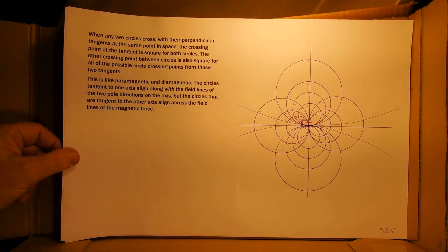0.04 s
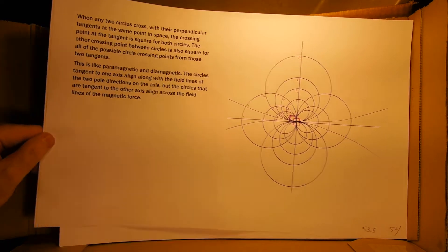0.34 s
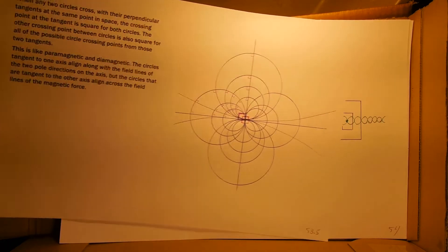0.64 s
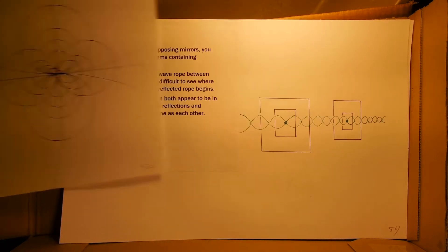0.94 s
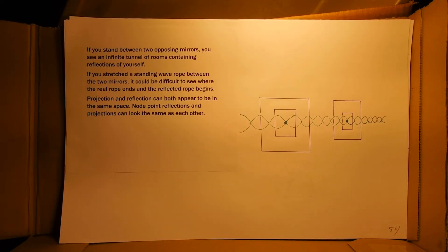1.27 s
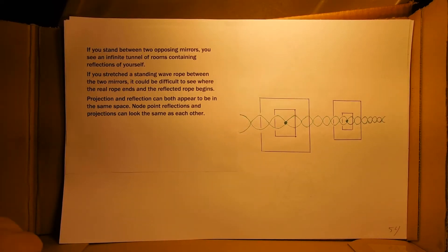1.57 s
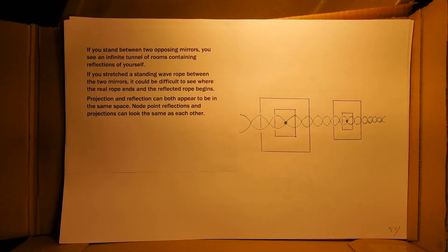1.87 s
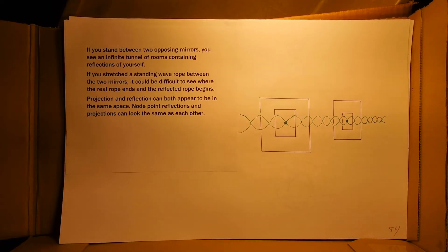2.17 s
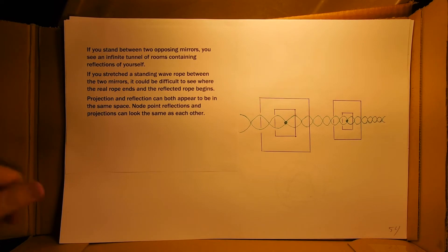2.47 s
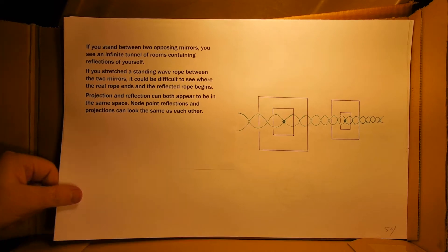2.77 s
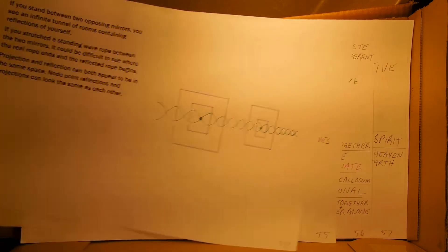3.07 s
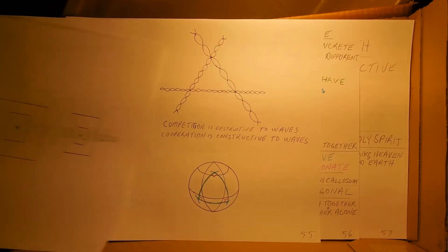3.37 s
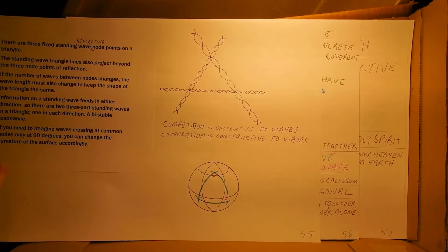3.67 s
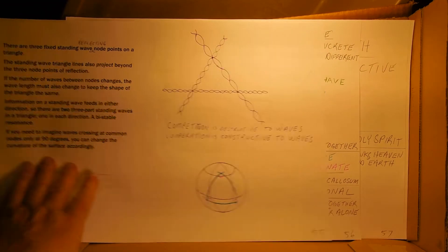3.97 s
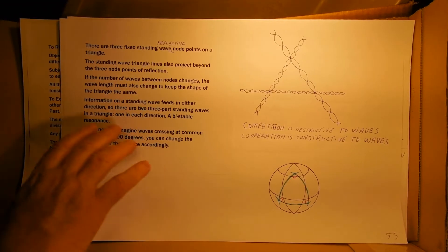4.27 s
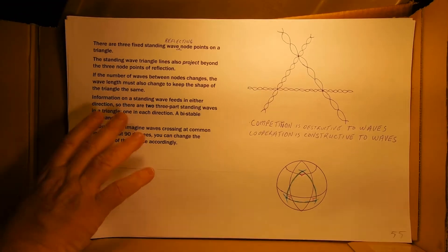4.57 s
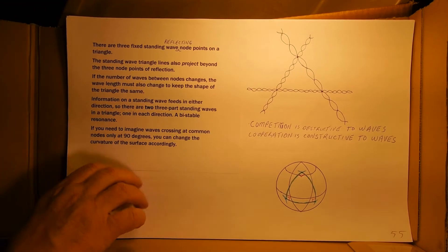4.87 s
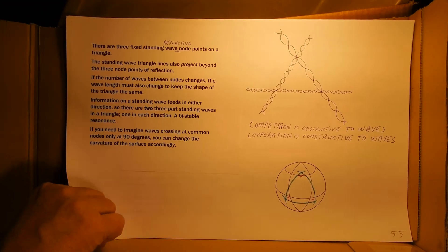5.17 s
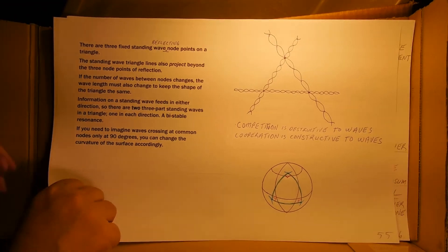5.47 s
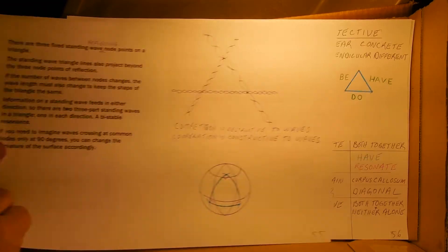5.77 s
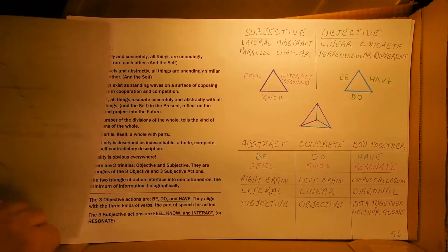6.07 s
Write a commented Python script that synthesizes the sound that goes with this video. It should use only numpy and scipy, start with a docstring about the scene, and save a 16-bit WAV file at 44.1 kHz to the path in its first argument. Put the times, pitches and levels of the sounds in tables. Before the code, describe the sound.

Large paper sheets are drawn one by one across a stack, heard up close over a faint room hush. Each move brings a soft swish of air, a dry hiss, a scraping edge and sharp buckling pops. One sheet slaps down early, a brief pause follows, and the handling grows firmer, peaking in a loud slap and wooden knock before more sliding. The surrounding wooden box adds tight echoes.

```python
"""Three large sheets of paper slide off a stack, one after another, in a wooden box in a quiet room.
Out of the hush the first sheet sweeps air aside, hisses over the next and scrapes with its edge. It buckles
with pops and, just after one second, slaps down. A lull follows, then firmer strokes and snaps around three
seconds, and a faint whistle. Past four seconds come the hardest slap and a knock on the wood; sliding and
popping run on to the end. The close wooden walls colour everything with short echoes."""
import sys
import numpy as np
from scipy import signal
from scipy.fft import rfft, irfft
from scipy.io import wavfile
from scipy.ndimage import uniform_filter1d, minimum_filter1d

SR = 44100
rng = np.random.default_rng(int(sys.argv[2]) if len(sys.argv) > 2 else 0)


def to_wav(sig):
    """Store sig (one row per channel, or 1-D mono) as 16-bit WAV at the path in sys.argv[1].

    Samples outside -1..1 are clipped; the rate is SR.
    """
    pcm = np.clip(np.atleast_2d(sig), -1, 1) * 32767
    pcm = np.round(pcm).astype(np.int16)
    wavfile.write(sys.argv[1], SR, pcm.T)  # frames by channels


N = 278712

# Tone curves for room hush, swept air, edge, face and landing. Each row: frequency in Hz, level in dB.
HUSH_EQ = [(20, -13), (74, -20), (204, -16), (399, -8.5), (1300, -6.5), (2400, -11), (16000, -29)]
SWEEP_EQ = [(60, -29), (150, -18), (300, -8), (450, -1.5), (800, 2.5), (1300, 6), (2000, 2.5), (4000, -51),
            (16000, -90)]
SCRAPE_EQ = [(100, -36), (400, -28.5), (900, -13.5), (1500, -4), (2100, 1.5), (3200, 0.5), (5000, -8.5),
             (9000, -12.5), (16000, -57)]
HISS_EQ = [(100, -47.5), (1000, -14.5), (3000, -5.5), (4500, -1.5), (6000, -1.5), (8000, 5), (9200, -2.5),
           (10500, -12), (13000, -23), (16000, -34)]
SLAP_EQ = [(30, -39), (200, -26), (400, -14.5), (900, -6.5), (1900, 3), (3200, -1), (5500, -5.5),
           (8200, -6.5), (11000, -22), (16000, -27)]
# The stereo image opens toward the treble. Each row: frequency in Hz, side level against mid in dB.
STEREO_WIDTH = [(60, -16), (300, -14.5), (1300, -10), (2400, -8), (4400, -3.5), (8000, -0.5), (16000, 0.5)]
# Standing waves between the walls. Each row: pitch in Hz, bandwidth in Hz, level in dB.
AIR_MODES = [(210, 12, 2), (391.4, 10, 2), (504, 45, -9), (764, 13.4, 2.5), (936, 37, -4.5)]
# Echoes off the wooden walls. Each row: delay in seconds, gain.
WALL_ECHOES = [(.0028, 0.25), (.0056, 0.31), (.0099, .5), (0.0127, 0.36)]
# A loose sheet bends and sweeps air aside. Each row: start, rise, hold and fade in seconds, level in dB.
AIR_SWEEPS = [(0.116, 0.012, 0.02, 2, -49.5), (1.009, 0.018, 0.021, 0.05, -35.5),
              (1.097, 0.076, 0.026, 0.22, -32), (1.334, 0.03, 0.19, 0.5, -43),
              (1.762, 0.039, 0.024, 0.13, -36), (3.15, 0.2, 0.016, 1.1, -37),
              (3.455, 0.053, 0.14, 0, -38.5), (4.048, 0.039, 0.036, 0.33, -38),
              (4.234, 0.027, 0.031, 0.15, -33), (4.646, 0.015, 0.028, 0.65, -44),
              (5.45, 0.13, 0.11, 0.25, -43), (5.836, 0.044, 0.037, 0.07, -29.5),
              (6.009, 0.011, 0.014, 0.27, -37.5), (6.135, 0.03, 0.16, 0.15, -35.5)]
# A hand pushes one sheet over another.
# Each row: start, rise, hold and fade in seconds, face hiss in dB, edge scrape in dB.
HAND_STROKES = [(.124, .025, .038, .06, -31.5, -38), (.2, .075, .012, .07, -39.5, -34),
                (.31, .05, .08, .2, -49, -43), (.36, .08, .19, .13, -36.5, -42),
                (.67, .1, .08, .35, -42.5, -45), (1.005, .025, .03, .05, -42, -50),
                (1.08, .06, .05, .17, -37, -31), (1.42, .09, .05, .2, -52, -38.5),
                (1.744, .045, .06, .14, -51, -42), (1.9, .1, .45, .5, -62, -63),
                (2.675, .02, .12, .15, -55, -55), (2.82, .1, .03, .1, -42, -44),
                (2.905, .085, .02, .22, -29.5, -42), (3.03, .11, .16, .34, -27, -31),
                (3.43, .025, .17, .08, -35, -36.5), (3.63, .06, .05, .27, -49, -44),
                (4.054, .062, .02, .14, -23, -29.5), (4.17, .04, .02, .12, -29, -33),
                (4.4, .04, .04, .05, -55, -58), (4.483, .015, .03, .2, -29.5, -29.5),
                (4.54, .02, .008, .1, -38, -22.5), (4.6, .06, .025, .1, -34, -35),
                (4.793, .004, .008, .035, -33, -38), (4.83, .028, .015, .05, -37, -32),
                (5.255, .017, .04, .15, -36.5, -41.5), (5.29, .11, .015, .12, -35, -24),
                (5.36, .06, .03, .17, -30, -40), (5.555, .018, .05, .25, -37, -37),
                (5.71, .095, .13, .3, -29, -31), (5.97, .05, .03, .1, -38, -34),
                (6.14, .04, .1, .3, -42, -41)]
# The free span of a rubbed sheet sings, lower as it lengthens.
# Each row: start and end in seconds, first and last pitch in Hz, level in dB.
SINGING_GLIDES = [(0.132, .22, 4900, 3980, -35), (.2, .31, 3600, 2600, -35),
                  (0.251, 0.332, 2250, 1855, -36.5), (0.517, .8, 4750, 4350, -43.5),
                  (1.356, 1.422, 1410, 1390, -42), (3.082, 3.161, 3200, 2490, -39),
                  (5.303, 5.468, 4410, 3345, -32.5)]
# A sheet buckles, small creases high and wide bulges low.
# Each row: start in seconds, level in dB, pitch in Hz, ring length in cycles.
BUCKLE_POPS = [(.464, -14.5, 2020, 8), (.510, -26, 900, 5), (.596, -26, 1390, 4.2), (.633, -40, 372, 6.7),
               (1.009, -26, 3800, 4.6), (1.028, -16, 3450, 9.3), (1.040, -24, 3900, 6),
               (1.055, -30, 3700, 5.3), (1.206, -9.5, 2020, 10), (1.441, -29, 1520, 13),
               (2.089, -33.5, 2530, 11), (2.216, -33, 1160, 13), (2.539, -28, 7950, 4.8),
               (2.712, -45, 307, 4.9), (2.826, -31.5, 1610, 23), (2.840, -23.5, 3800, 1.6),
               (3.057, -24.5, 500, 4.5), (3.074, -13, 7240, 4), (3.154, -8, 2500, 2.3),
               (3.235, -31.5, 448, 6), (3.458, -10, 2200, 2.5), (3.480, -12.5, 1410, 5.6),
               (4.081, -19.5, 2040, 29), (4.293, -4.5, 1780, 6.2), (4.682, -7, 2830, 9.6),
               (4.788, -26.5, 1780, 22), (4.796, -25, 6860, 13), (4.867, -28.5, 830, 5.1),
               (5.165, -23, 2450, 3.5), (5.181, -25.5, 5040, 1.9), (5.286, -27, 780, 8),
               (5.568, -13, 2630, 1.7), (5.606, -18, 3000, 2.2), (5.630, -10.5, 1940, 5.7),
               (5.847, -26, 895, 8.7), (5.888, -20, 2960, 5.4), (5.905, -13, 2460, 3.7),
               (6.154, -19.5, 1700, 3.5)]
# Round, low thumps: after big paper snaps, and at the knock on the wood.
# Each row: start in seconds, level in dB, pitch in Hz, ring length in cycles.
LOW_THUMPS = [(.465, -20.5, 1030, 8.7), (.642, -48, 213, 8.5), (3.064, -42.5, 205, 12),
              (3.157, -21.5, 1030, 9.1), (3.242, -45, 212, 7.9), (3.464, -21.5, 983, 13),
              (4.229, -7.5, 493, 7.8), (4.302, -15.5, 775, 16), (5.636, -18, 801, 20.4)]
# A sheet lands, touching down bit by bit.
# Each row: start in seconds, level in dB, swell and fade in seconds, centre of the crack in Hz.
LANDINGS = [(1.075, -8.5, 0.01, 0.0094, 3100), (1.108, -9.5, 0.0039, 0.015, 3070),
            (1.143, -13, 0.015, 0.016, 2270), (4.225, -1.5, 0.002, 0.008, 7500),
            (4.678, -8.5, 0.0013, 0.0047, 5940), (5.112, -38, 0.015, 0.0069, 2800)]
# Faint, narrow, steady whistling tones. Each row: start and end in seconds, pitch in Hz, level in dB.
WHISTLE_TONES = [(3.6, 3.93, 1290, -46), (3.55, 3.95, 465, -57), (4.92, 5.14, 1345, -54),
                 (4.93, 5.1, 1110, -57)]
# The edge of the stack knocks against the wood. Each row: start in seconds, level in dB.
STACK_KNOCKS = [(4.230, -6), (4.682, -30)]
# The ring of the knocked wood. Each row: pitch in Hz, level in dB, ring length in cycles.
WOOD_MODES = [(386, -10.5, 28), (530.6, -9, 66), (990, 3.5, 19)]

# Layer faders, on top of the levels in the rows.
SWEEP_DB, SCRAPE_DB, HISS_DB = -2.5, -1, 1.9
BUCKLE_DB, THUMP_DB, SLAP_DB, KNOCK_DB = 3, 3, 2, 3
FLAT_EQ = [(20, 0)]


def from_db(db):
    """Decibels to gain."""
    return 10 ** (np.asarray(db) / 20)


def rms_one(x):
    """Scale to rms 1."""
    return x / np.sqrt(np.mean(x ** 2) + 1e-20)


def gain_at(curve, hz):
    """Gain of a tone curve, its points joined on a log-frequency axis."""
    known_hz, level_db = np.transpose(curve)
    return from_db(np.interp(np.log(hz + 1), np.log(known_hz), level_db))


def low_pass(x, hz, order=2):
    """Butterworth low-pass."""
    return signal.sosfilt(signal.butter(order, min(hz, .45 * SR), fs=SR, output="sos"), x + 1e-18)


def resonance(x, hz, width_hz):
    """Two-pole resonance with gain 1 at its peak."""
    r = np.exp(-np.pi * width_hz / SR)
    feedback = [1, -2 * r * np.cos(2 * np.pi * hz / SR), r * r]
    return signal.lfilter(np.array([1, 0, -1]) * (1 - r * r) / 2, feedback, x + 1e-18)


def drift(rate):
    """A random modulator of rms 1 that glides to a new value rate times a second."""
    knots = rng.standard_normal(N // 4)
    return rms_one(np.interp(np.arange(N) * rate / SR, np.arange(len(knots)), knots))


def noise(eq, grain=1, size=N):
    """Stereo noise of rms 1, roughened by a grain envelope and widest in the treble."""
    hz = np.arange(size // 2 + 1) * SR / size
    mid, side = rfft(rng.standard_normal((2, size)) * grain) * gain_at(eq, hz)
    side = side * gain_at(STEREO_WIDTH, hz)
    return rms_one(irfft([mid + side, mid - side], size))


def add(out, start_s, sound):
    """Drop a short sound onto a stereo track."""
    at = round(start_s * SR)
    out[:, at:at + sound.shape[1]] += sound[:, :N - at]


def standing_waves(x):
    """The air rings between the wooden walls."""
    return sum(from_db(db) * resonance(x, hz, width_hz) for hz, width_hz, db in AIR_MODES)


def room_hush(level_db=-56, box_ring=0.075):
    """A steady bed of room tone, with a trace of the ring of the box."""
    hush = noise(HUSH_EQ)
    return from_db(level_db) * rms_one(hush + box_ring * standing_waves(hush))


def push(start_s, rise_s, hold_s, fade_s, rise_power=0.92, stop_fades=1.6):
    """Speed of one movement: it builds, holds and dies away until friction brings it to rest."""
    t = np.arange(N) / SR - start_s
    rise = np.clip(t / rise_s, 0, 1) ** rise_power
    fades = np.clip((t - rise_s - hold_s) / fade_s, 0, 10)
    braking = 1 + (fades / stop_fades) ** 4
    return rise * from_db(-20 * fades) / braking


def friction(eq, grain_db, grains_per_s, judder_db=1.0, judders_per_s=110):
    """Fibres catch and let go in tiny grains, while the whole sheet judders slightly."""
    return noise(eq, from_db(grain_db * drift(grains_per_s) + judder_db * drift(judders_per_s)))


def under_sheet(x, delay_s=0.000696, depth=0.304, changes_per_s=9, echo_gain=0.34):
    """Friction echoes under the lifted sheet, flanging softly as the gap opens and closes."""
    lag = delay_s * SR * np.exp(depth * drift(changes_per_s))
    at = np.arange(N)
    echo = np.array([np.interp(at - lag, at, channel) for channel in x])
    return (x + echo_gain * echo) / np.hypot(1, echo_gain)


def sliding(edge_flex_db=-20.5):
    """The flexing sheet sweeps air along, its edge scrapes and its face hisses; moves add in power."""
    sweep_power = sum((from_db(db) * push(*timing)) ** 2 for *timing, db in AIR_SWEEPS)
    hiss_power = scrape_power = 0
    for *timing, hiss_db, scrape_db in HAND_STROKES:
        speed = push(*timing)
        hiss_power += (from_db(hiss_db) * speed) ** 2
        scrape_power += (from_db(scrape_db) * speed) ** 2
    sweep_power += scrape_power * from_db(edge_flex_db) ** 2  # a scraping edge bends the sheet a little
    sweep = np.sqrt(sweep_power) * friction(SWEEP_EQ, grain_db=2.5, grains_per_s=600)
    scrape = np.sqrt(scrape_power) * friction(SCRAPE_EQ, grain_db=2.5, grains_per_s=1500)
    hiss = np.sqrt(hiss_power) * friction(HISS_EQ, grain_db=0.5, grains_per_s=4600)
    return from_db(SWEEP_DB) * sweep + under_sheet(from_db(SCRAPE_DB) * scrape + from_db(HISS_DB) * hiss)


def box_and_room(x, wet_db, scatter_t60_s=0.11, room_t60_s=0.28, build_up_s=0.00064):
    """Standing waves and wall echoes, a quick scatter inside the box, then the darker tail of the room."""
    t = np.arange(SR * 2 // 3) / SR
    direct, echoes = (t == 0) * 1., np.zeros(len(t))
    for delay_s, gain in WALL_ECHOES:
        echoes[round(delay_s * SR)] += gain
    wet = low_pass(echoes, hz=2500, order=1)
    build_up = 1 - np.exp(-t / build_up_s)
    for t60_s, level_db, top_hz in [(scatter_t60_s, 1.5, 7000), (room_t60_s, -1, 3000)]:
        tail = noise(FLAT_EQ, size=len(t)) * from_db(-60 * t / t60_s) * build_up
        wet = wet + from_db(level_db) * low_pass(rms_one(tail), top_hz, order=1) / np.sqrt(len(t))
    response = direct + standing_waves(direct) + from_db(wet_db) * wet
    response /= np.sqrt(np.sum(response ** 2) / 2)
    return signal.fftconvolve(x, response, axes=1)[:, :N]


def airy_note(length_s, start_hz, end_hz, width_share):
    """A narrow band of hiss that swells and fades on its way from one pitch to another."""
    size = round(length_s * SR)
    phase = 2 * np.pi * np.cumsum(np.geomspace(start_hz, end_hz, size)) / SR
    real, imag = low_pass(rng.standard_normal((2, SR)), width_share * start_hz)[:, -size:]
    swell = np.sin(np.pi * np.arange(size) / size)
    return swell * rms_one(real * np.cos(phase) + imag * np.sin(phase))[None]


def singing():
    """Friction feeds one resonance of a scraped sheet, which sings in broad, falling notes."""
    out = np.zeros((2, N))
    for start_s, end_s, start_hz, end_hz, db in SINGING_GLIDES:
        add(out, start_s, from_db(db) * airy_note(end_s - start_s, start_hz, end_hz, width_share=0.13))
    return out


def pop(hz, cycles, crinkle_db=-10, crinkle_s=0.006, overtone_reach=2.4, bass_share=0.21, top_hz=9000):
    """One damped pulse with a brief crinkle, peaking at 1; a wide, low patch makes no treble."""
    t = np.arange(SR // 8) / SR
    crinkle = noise(FLAT_EQ, size=len(t)) * np.exp(-t / crinkle_s) * np.sqrt(hz / SR)
    width_hz = np.log(1000) / np.pi * hz / cycles  # rings down 60 dB over the given cycles
    pulse = resonance((t == 0) + from_db(crinkle_db) * crinkle, hz, width_hz)
    pulse = low_pass(pulse, min(overtone_reach * hz, top_hz), order=3)
    pulse -= low_pass(pulse, bass_share * hz, order=1)  # air slips round the sheet and cancels the bass
    return pulse / np.abs(pulse).max()


def buckles():
    """A patch of paper flips over with a pop."""
    out = np.zeros((2, N))
    for start_s, db, hz, cycles in BUCKLE_POPS:
        add(out, start_s, from_db(db) * pop(hz, cycles))
    return from_db(BUCKLE_DB) * out


def thumps(rustle=0.53, rustle_width_share=0.57):
    """Round, low thumps: each a tone that swells over a few cycles, rustling, and dies away."""
    out = np.zeros((2, N))
    for start_s, db, hz, cycles in LOW_THUMPS:
        turns = hz * np.arange(SR // 8) / SR
        flutter = rng.standard_normal(len(turns))
        for _ in range(2):
            flutter = rms_one(resonance(flutter, hz, rustle_width_share * hz))
        envelope = turns * from_db(-60 * turns / cycles)
        thump = envelope * (np.sin(2 * np.pi * turns) + rustle * flutter)
        add(out, start_s, from_db(db) * thump[None] / np.abs(thump).max())
    return from_db(THUMP_DB) * out


def slaps(crackle_db=2.5, crackles_per_s=1500, focus=1.27, width_share=0.84, treble_reach=2.56):
    """A landing sheet crackles with many contacts that swell and die away round one broad resonance."""
    out, t = np.zeros((2, N)), np.arange(SR // 4) / SR
    crackle = noise(SLAP_EQ, from_db(crackle_db * drift(crackles_per_s)))
    for start_s, db, swell_s, fade_s, hz in LANDINGS:
        at = round(start_s * SR)
        burst = crackle[:, at:at + len(t)]
        crack = burst + focus * resonance(burst, hz, width_share * hz)
        crack = rms_one(low_pass(crack, treble_reach * hz, order=1))
        contact = np.minimum(t / swell_s, 1) * np.exp(-np.maximum(t - swell_s, 0) / fade_s)
        add(out, start_s, from_db(db) * contact * crack)
    return from_db(SLAP_DB) * out


def whistles():
    """Faint, narrow, steady whistling tones."""
    out = np.zeros((2, N))
    for start_s, end_s, hz, db in WHISTLE_TONES:
        add(out, start_s, from_db(db) * airy_note(end_s - start_s, hz, hz, width_share=0.022))
    return out


def knocks():
    """The stack meets the wood and sets its modes ringing, neighbours in opposite directions."""
    out = np.zeros((2, N))
    for start_s, db in STACK_KNOCKS:
        for k, (hz, mode_db, cycles) in enumerate(WOOD_MODES):
            add(out, start_s, (-1) ** k * from_db(db + mode_db) * pop(hz, cycles))
    return from_db(KNOCK_DB) * out


def scene(action_db=-0.5):
    """Paper in the box over the hush of the room; the broad slides sit drier than the snaps."""
    drier = box_and_room(sliding() + singing() + whistles() + knocks(), wet_db=-12.0)
    wetter = box_and_room(buckles() + thumps() + slaps(), wet_db=-2.8)
    return from_db(action_db) * (drier + wetter) + room_hush()


def record(dry, ceiling=0.82, cutoff_hz=15800):
    """A quick limiter holds down the loudest slaps, and a steep filter trims the very top."""
    allowed = ceiling / np.maximum(np.abs(dry).max(axis=0), ceiling)
    gain = uniform_filter1d(minimum_filter1d(allowed, size=65), size=65)
    high_cut = signal.ellip(12, .1, 95, cutoff_hz, fs=SR, output="sos")
    return signal.sosfilt(high_cut, dry * gain)


dry = scene()
out = record(dry)
to_wav(out)
```